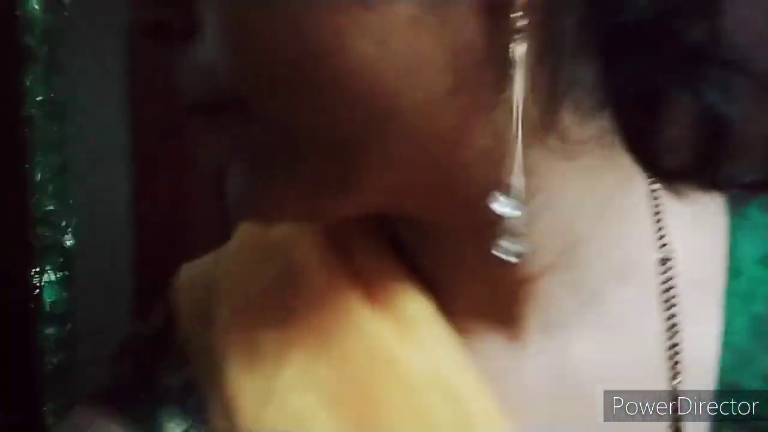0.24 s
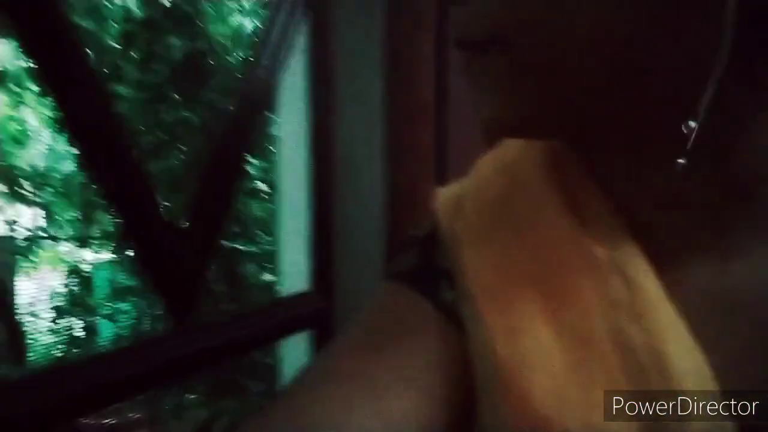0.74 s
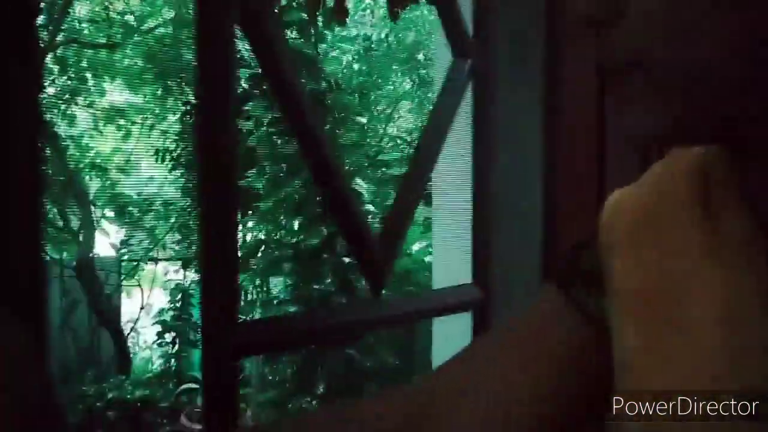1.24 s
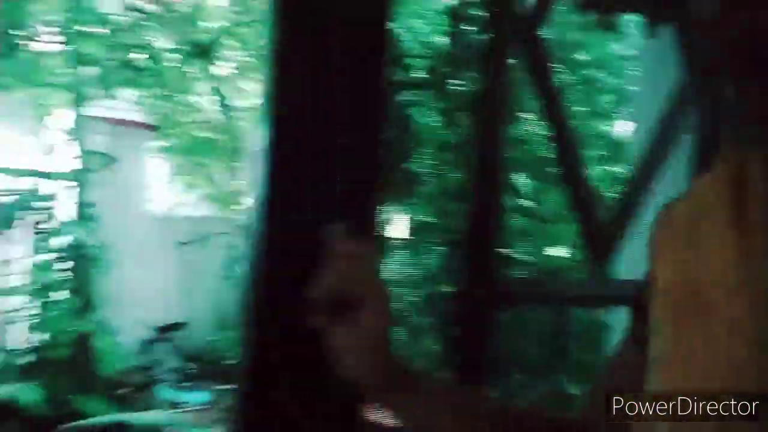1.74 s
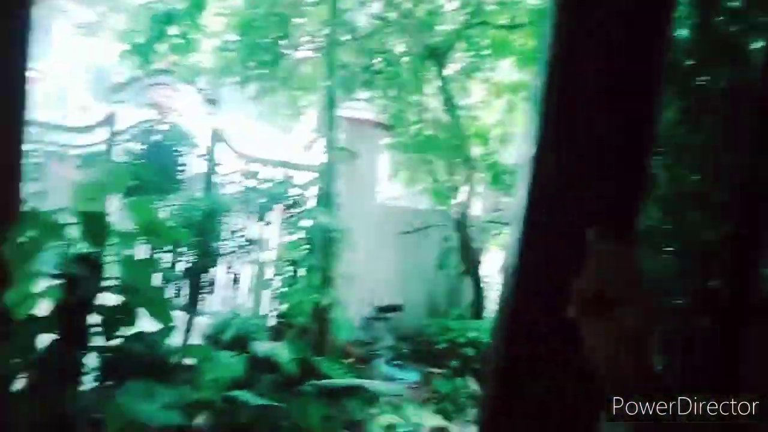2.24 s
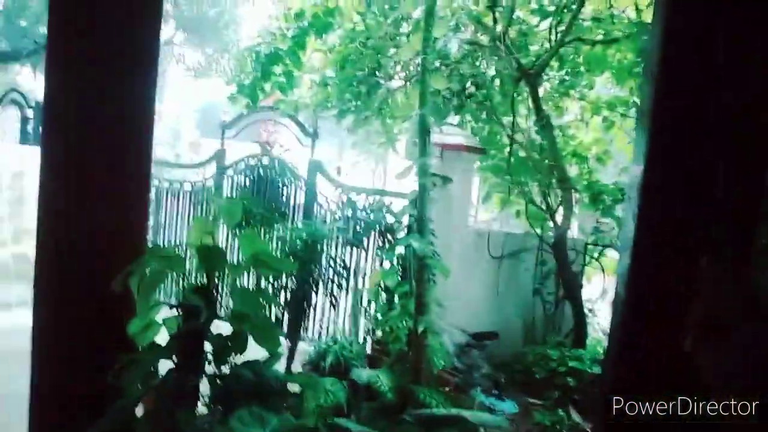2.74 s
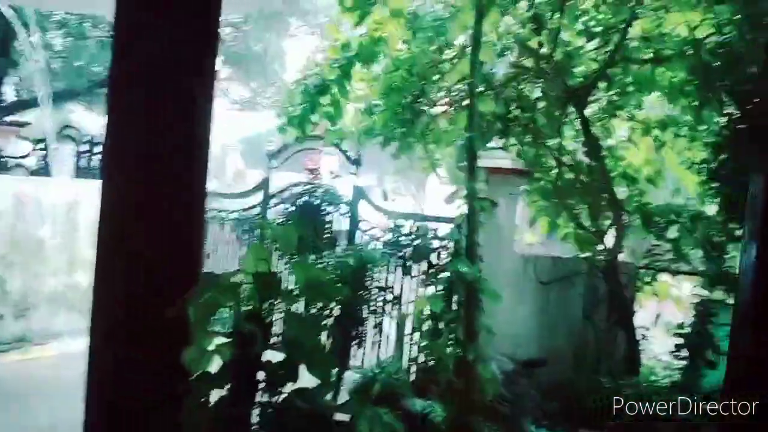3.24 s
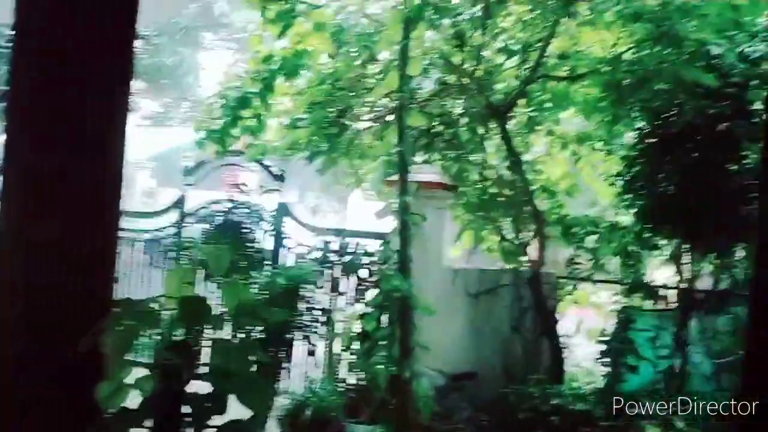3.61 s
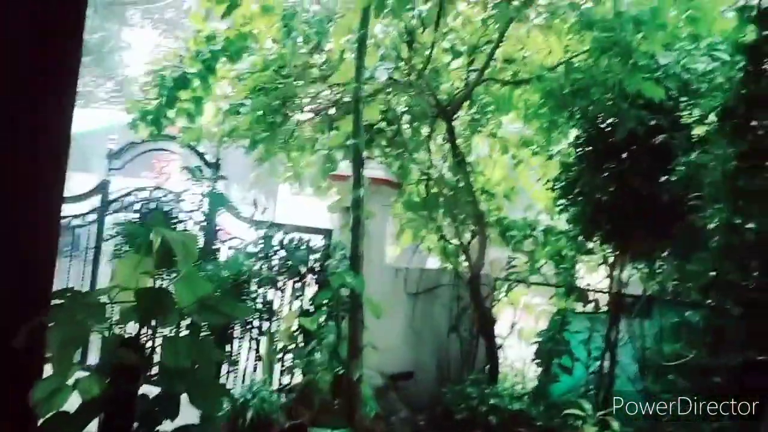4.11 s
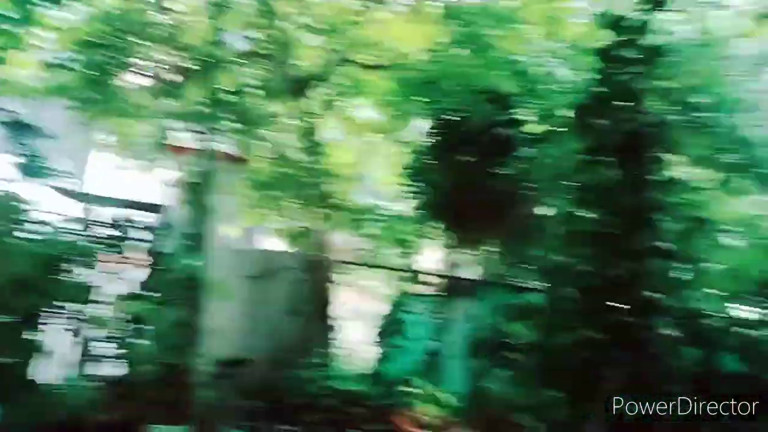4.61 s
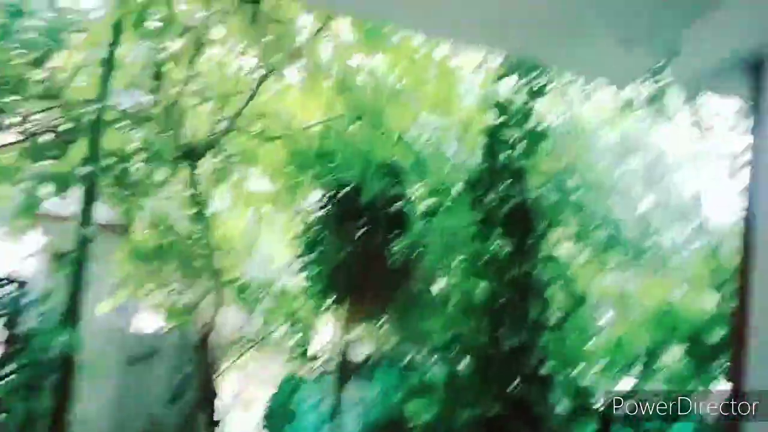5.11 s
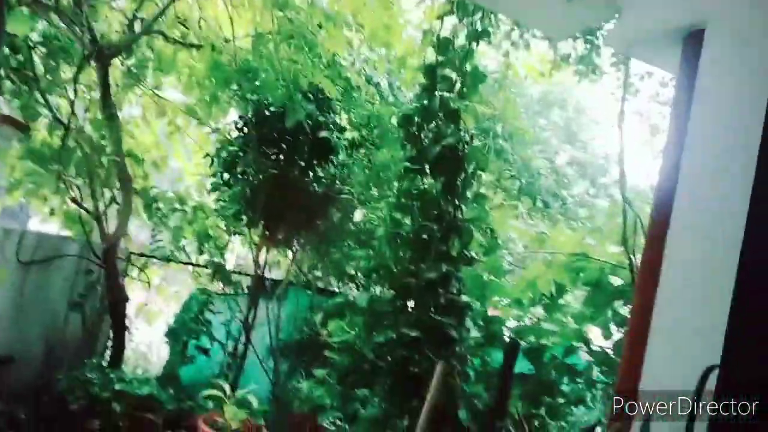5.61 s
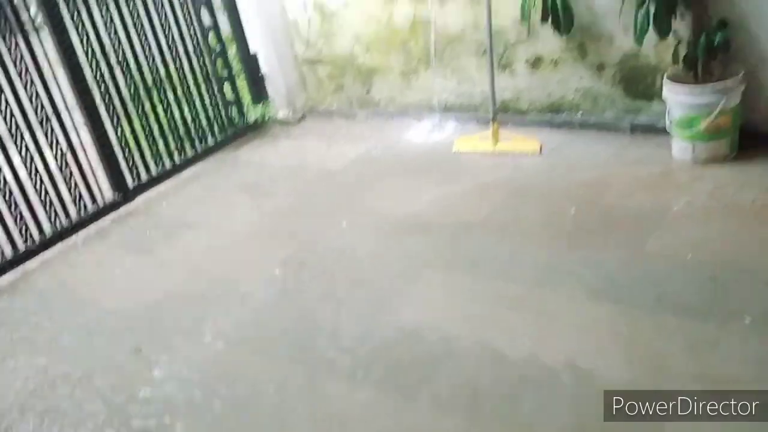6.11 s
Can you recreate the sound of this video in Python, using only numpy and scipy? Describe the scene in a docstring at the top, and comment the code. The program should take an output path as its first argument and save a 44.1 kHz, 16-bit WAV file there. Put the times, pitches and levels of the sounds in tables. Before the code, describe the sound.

Heavy rainwater runs off a roof, splattering on wet concrete and plopping into a puddle, then cuts out and returns muffled.

```python
"""Wet concrete yard under heavy roof runoff, heard on a phone carried from a window to the porch.
The stream breaks into lumps: each slaps the ground and throws spray that lands a moment later.
Gouts plop into a puddle, small bubbles ring; the phone rumbles and is bumped in the hand.
After a short silence, a soft thump and the yard again, muffled and swelling."""
import sys
import numpy as np
from scipy import signal
from scipy.fft import rfft, irfft, next_fast_len
from scipy.io import wavfile
from scipy.ndimage import uniform_filter1d

SR = 44100
rng = np.random.default_rng(int(sys.argv[2]) if len(sys.argv) > 2 else 0)


def wav_record(signal):
    """Record a signal, one row per channel, as 16-bit PCM in the file named by sys.argv[1]."""
    frames = np.transpose(np.atleast_2d(signal))
    bounded = np.clip(frames, -1, 1)
    # unit amplitude maps onto the largest positive 16-bit level
    quanta = np.round(bounded * 32767).astype(np.int16)
    wavfile.write(sys.argv[1], SR, quanta)


N = 280299
TIME = np.arange(N) / SR

# slap spectrum at each place: (frequency [Hz], relative level [dB])
SLAP_WINDOW = [(80, -43.5), (140, -18), (230, -14), (380, -14.5), (900, -8.5), (1900, -7), (2500, -1.5),
               (2900, -4.5), (3600, -11), (4600, -15), (6000, -35.5), (9000, -70)]
SLAP_DOOR = [(80, -48.5), (140, -18), (230, -17.5), (380, -15), (900, -10.5), (1900, -6), (2500, -1.5),
             (2900, -1), (3600, -9.5), (4600, -19.5), (6000, -40), (9000, -70)]
SLAP_GARDEN = [(80, -49.5), (140, -18), (230, -13.5), (380, -16), (900, -8), (1900, -6.5), (2500, 0.5),
               (2900, 1.5), (3600, -6), (4600, -17.5), (6000, -38), (9000, -70)]
SLAP_PORCH = [(80, -45.5), (140, -15.5), (230, -13), (380, -14), (900, -6.5), (1900, -5.5), (2500, 0.5),
              (2900, -1), (3600, -6.5), (4600, -14), (6000, -29.5), (9000, -65.5)]
# spray spectrum at each place: (frequency [Hz], relative level [dB])
SPRAY_WINDOW = [(3300, -37.5), (4900, -8.5), (6000, -6.5), (7400, -4.0), (8200, 1), (9100, -6),
                (10600, -6.5), (12200, -8.5), (13400, -4), (15300, 0)]
SPRAY_DOOR = [(3300, -30), (4900, -9), (6000, -5), (7400, 0.5), (8200, 1.5), (9100, -6.5), (10600, -4),
              (12200, -2), (13400, 3), (15300, -4)]
SPRAY_GARDEN = [(3300, -38), (4900, -13.5), (6000, -5), (7400, 1), (8200, -1.5), (9100, -10), (10600, -2),
                (12200, -3), (13400, -5.5), (15300, -7)]
SPRAY_PORCH = [(3300, -35), (4900, -11), (6000, -8), (7400, -4.5), (8200, 1.5), (9100, -5), (10600, -6.5),
               (12200, -6.5), (13400, -1.5), (15300, -2)]
# listener's path: (time [s], place [0 window, 1 doorway, 2 facing the garden, 3 porch])
WALK = [(2.1, 0), (2.9, .5), (3.2, 1), (3.6, 1.15), (4.15, 2), (4.45, 2.05), (4.85, 3)]
# runoff, one row per place: (slap level [dB], spray re slap [dB])
PLACE_LEVELS = [(-27.5, -1.28), (-25, -.6), (-25, -2), (-26.5, -0.3)]
# stream swells and lulls: (time [s], flow change [dB], half-width [s])
SURGES = [(.05, -1, .15), (0.957, -3, .035), (1.03, 0.5, .02), (1.305, -4, .06), (1.53, 1.5, .05),
          (2.002, -2.5, .035), (2.283, 2, .05), (2.41, -1, .04), (3.01, -3.5, .04), (3.19, 0.5, .04),
          (3.665, -1.1, .05), (3.76, 1.5, .025), (4.38, 2, .025), (4.728, -4.5, .06), (4.803, 2.5, .025),
          (4.92, 1.3, .03), (5.09, -3.5, .035), (5.464, -6, .04)]
# gouts in the puddle: (time [s], level [dB], cavity pitch [Hz], cavity Q [-], decay [s])
GOUTS = [(.555, -24.5, 2680, 4.2, 0.025), (0.706, -30.5, 1020, 1.3, 0.084),
         (0.703, -22.5, 2750, 1.3, 0.013), (.862, -26.5, 2430, 5, .025), (1.099, -19.5, 2330, 4.6, .01),
         (1.107, -30.5, 1060, 1.1, 0.061), (1.705, -23, 2550, 3, 0.019), (1.928, -26, 1270, 1.8, 0.014),
         (2.281, -20, 2670, 3, 0.015), (2.299, -25.5, 3680, 1.8, 0.041), (2.839, -27, 1320, 3, 0.05),
         (3.162, -26, 1900, 2, 0.027), (3.541, -22, 2200, 2.1, 0.014), (4.015, -24.5, 1900, 1.3, 0.027),
         (4.265, -29.5, 1350, 2, .025), (4.371, -30.5, 2800, 2.7, 0.022), (4.574, -34, 1300, 2.6, 0.058),
         (5.155, -22, 1080, 2.3, 0.027)]
# close showers of fine droplets: (time [s], level [dB])
SPATTERS = [(.303, -32), (1.218, -29), (2.298, -26.5), (4.372, -26), (5.17, -24.5)]
# muffled yard spectrum: (frequency [Hz], relative level [dB])
YARD_SPECTRUM = [(45, -9), (130, -19.5), (350, -18), (720, -11.5), (1450, -7), (1950, -8), (2550, -1.5),
                 (3300, -9.5), (4300, -16.5), (7200, -38), (8700, -37.5), (10200, -22.5), (12000, -31),
                 (13500, -41)]
# knocks on the phone: (time [s], envelope peak [dB], pitch [Hz])
BUMPS = [(3.607, -30, 165), (3.651, -35.5, 160), (3.780, -27.5, 400), (3.787, -24.5, 208),
         (3.833, -26, 420), (3.845, -28, 190)]
# carrying rumble and grip rub spectra: (frequency [Hz], relative level [dB])
RUMBLE_SPECTRUM = [(13, -32), (22, 6), (48, 7), (91, 7.5), (124, -6.5), (150, -4.5), (200, -27),
                   (330, -120)]
GRIP_SPECTRUM = [(90, -24), (170, 0.5), (260, -5), (500, -29)]

SILENCE_START_S, SILENCE_END_S = 5.490, 6.102
TOP_HZ = 15450


def stream(lumps_per_s=190, slap_s=0.011, spray_s=0.012, bed=1.4):
    """Lumps land unevenly: a slap and a shower of droplets each, over a steady bed."""
    lumps = impacts(lumps_per_s, spread_db=4)
    lumps = lumps / lumps.mean()
    slap = droplets(bed + tail(lumps, slap_s), base_per_s=1800, spread_db=3, wash_db=2)
    spray = droplets(bed + tail(lumps, spray_s), base_per_s=3100, spread_db=5.5, wash_db=-3)
    near_drops = impacts(per_s=110, spread_db=6.5)
    crackle = np.sqrt(tail(near_drops ** 2, decay_s=0.0008)) * rng.standard_normal(N)
    ticks = unit(near_drops) + unit(crackle)
    return slap + undb(-19.5) * ticks, spray + undb(-14.5) * ticks


def flow(wobble_db=0.26, knots_per_s=13):
    """Stream strength in dB: surges and lulls over a slight random wobble."""
    knots_s = np.arange(0, N / SR + 1, 1 / knots_per_s)
    wobble = np.interp(TIME, knots_s, rng.standard_normal(N)[:len(knots_s)])
    return sum(hump(*surge) for surge in SURGES) + wobble_db * wobble


def runoff(slap, spray, spray_lag_s=0.018):
    """Slaps follow the flow, spray follows late; the listening place sets level and colour."""
    place = np.interp(TIME, *np.transpose(WALK))
    slap_db, spray_db = (np.interp(place, range(4), db) for db in np.transpose(PLACE_LEVELS))
    flow_db = flow()
    late_flow_db = np.interp(TIME - spray_lag_s, TIME, flow_db)
    slaps = crossfade(slap, [SLAP_WINDOW, SLAP_DOOR, SLAP_GARDEN, SLAP_PORCH], place)
    slaps += undb(-15) * bubbles()
    sprays = crossfade(spray, [SPRAY_WINDOW, SPRAY_DOOR, SPRAY_GARDEN, SPRAY_PORCH], place)
    return undb(slap_db) * (undb(flow_db) * slaps + undb(late_flow_db + spray_db) * sprays)


def gouts(spray_db=-14, flight_s=0.025, attack_s=0.0007):
    """A gout rattles the cavity it digs in the puddle; its spray lands just after."""
    plops, shower = np.zeros(N), np.zeros(N)
    t = TIME[:SR // 4]
    for time_s, db, hz, q, decay_s in GOUTS:
        cavity = signal.iirpeak(hz, q, fs=SR)
        churn = signal.lfilter(*cavity, signal.lfilter(*cavity, rng.standard_normal(len(t))))
        envelope = np.exp(-t / decay_s) * (1 - np.exp(-t / attack_s))
        plop = unit(churn * envelope) * np.sqrt(np.mean(envelope ** 2))
        add(plops, time_s, undb(db) * plop)
        add(shower, time_s, undb(db + spray_db) * t / flight_s * np.exp(1 - t / flight_s))
    return plops + shower * colour(rng.standard_normal(N), SPRAY_PORCH)


def spatters(decay_s=0.025):
    """A handful of droplets lands close by and dies away."""
    power = sum(undb(db) ** 2 * (TIME > time_s) * np.exp(-abs(TIME - time_s) / decay_s)
                for time_s, db in SPATTERS)
    clicks = droplets(np.ones(N), base_per_s=1300, spread_db=5, wash_db=-5.5)
    return np.sqrt(power) * colour(clicks, SPRAY_WINDOW)


def bubbles(count=220, centre_hz=2400, spread_oct=0.4, spread_db=4, decay_cycles=18, rise=0.08):
    """Trapped bubbles ring briefly, rising in pitch as they surface."""
    out, t = np.zeros(N), TIME[:SR // 20]
    times_s = rng.uniform(0, N / SR, count)
    for time_s, (pitch, level) in zip(times_s, rng.standard_normal((count, 2))):
        cycles = centre_hz * 2 ** (spread_oct * pitch) * t
        age = cycles / decay_cycles
        ring = np.exp(-age) * np.sin(2 * np.pi * cycles * (1 + rise * age / 2))
        add(out, time_s, undb(spread_db * level) * ring)
    return unit(out)


def yard(slap, start_db=-32, swell_db_per_s=14):
    """Muffled splatter, growing louder, with one heavier splash."""
    splash_db = hump(centre_s=6.3, height=2.6, half_width_s=0.012)
    level_db = start_db + swell_db_per_s * np.maximum(TIME - SILENCE_END_S, 0) + splash_db
    return undb(level_db) * colour(slap, YARD_SPECTRUM)


def thump(peak_db=-28, decay_s=0.039):
    """Soft thump as the silence ends: a decaying step."""
    return undb(peak_db) * np.exp(-np.maximum(TIME - SILENCE_END_S, 0) / decay_s)


def bumps(rise_cycles=0.4):
    """Damped knocks of a hand on the phone; soft contact slows the onset."""
    out, t = np.zeros(N), TIME[:SR // 15]
    for time_s, db, hz in BUMPS:
        age = hz * t / rise_cycles
        add(out, time_s, undb(db) * age * np.exp(1 - age) * np.sin(2 * np.pi * hz * t))
    return out


def handling(base_db=-53, drift_db_per_s=-0.6, swing_s=2.5):
    """The carried phone rumbles, most as it swings away from the window; the shifting grip rubs."""
    swing_db = hump(swing_s, height=5.5, half_width_s=0.39)
    rumble_db = base_db + drift_db_per_s * (TIME - swing_s) + swing_db
    rumble = undb(rumble_db) * colour(rng.standard_normal(N), RUMBLE_SPECTRUM)
    grip = hump(centre_s=2.69, height=undb(-46), half_width_s=0.077)
    return rumble + grip * colour(rng.standard_normal(N), GRIP_SPECTRUM)


def droplets(density, base_per_s, spread_db, wash_db):
    """Clicks at base rate times density, over the wash of their reflections."""
    clicks = impacts(base_per_s * density, spread_db) * rng.choice([-1, 1], N)
    return unit(clicks) + undb(wash_db) * np.sqrt(density) * rng.standard_normal(N)


def impacts(per_s, spread_db):
    """Impulses of random time and size."""
    hits = rng.random(N) < per_s / SR
    return hits * undb(spread_db * np.clip(rng.standard_normal(N), -2.5, 2.5))


def crossfade(x, spectra, place):
    """Blend the colours of neighbouring places at constant power."""
    mix = sum(np.clip(1 - abs(place - k), 0, 1) * colour(x, spectrum)
              for k, spectrum in enumerate(spectra))
    power = uniform_filter1d(mix ** 2, SR // 5)
    return mix / np.sqrt(power)


def colour(x, spectrum):
    """Minimum-phase filter, closed above the band; output rms 1."""
    hz, db = np.transpose([*spectrum, (TOP_HZ + 2000, -60)])
    size = next_fast_len(N + SR // 4) * 2
    bins_hz = np.maximum(np.arange(size // 2 + 1) * SR / size, 1)
    shape_db = np.interp(np.log(bins_hz), np.log(hz), db)
    cepstrum = irfft(np.log(undb(shape_db)))
    cepstrum[1:size // 2] *= 2
    cepstrum[size // 2 + 1:] = 0
    return unit(irfft(rfft(x, size) * np.exp(rfft(cepstrum)))[:N])


def tail(x, decay_s):
    """Spread each impulse into an exponential of equal area."""
    pole = np.exp(-1 / (decay_s * SR))
    return signal.lfilter([1 - pole], [1, -pole], x)


def hump(centre_s, height, half_width_s):
    """Gaussian rise and fall."""
    return height * np.exp(-((TIME - centre_s) / half_width_s) ** 2)


def add(out, time_s, sound):
    """Mix a sound in at a time."""
    start = int(time_s * SR)
    out[start:start + len(sound)] += sound[:N - start]


def undb(db):
    """Decibels to gain."""
    return 10 ** (np.asarray(db) / 20)


def unit(x):
    """Scale to rms 1."""
    return x / np.sqrt(np.mean(x ** 2))


def scene():
    """Runoff, silence, muffled yard; both channels alike."""
    slap, spray = stream()
    clear = runoff(slap, spray) + gouts() + spatters() + bumps() + handling()
    muffled = yard(slap) + thump()
    mono = clear * (TIME < SILENCE_START_S) + muffled * (TIME > SILENCE_END_S)
    return np.array([mono, mono])


def record(dry):
    """The phone's steep low-pass."""
    return signal.sosfilt(signal.ellip(12, 0.1, 85, TOP_HZ, fs=SR, output="sos"), dry)


dry = scene()
out = record(dry)
wav_record(out)
```